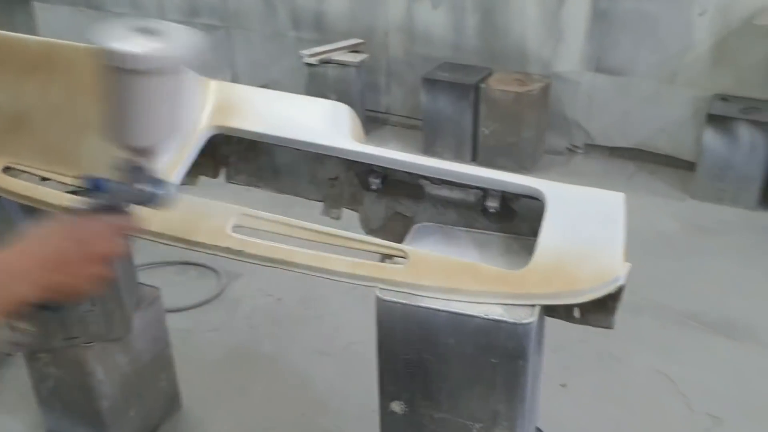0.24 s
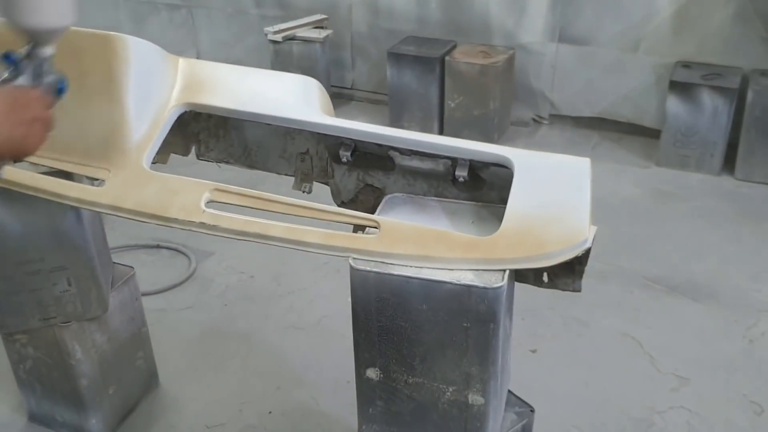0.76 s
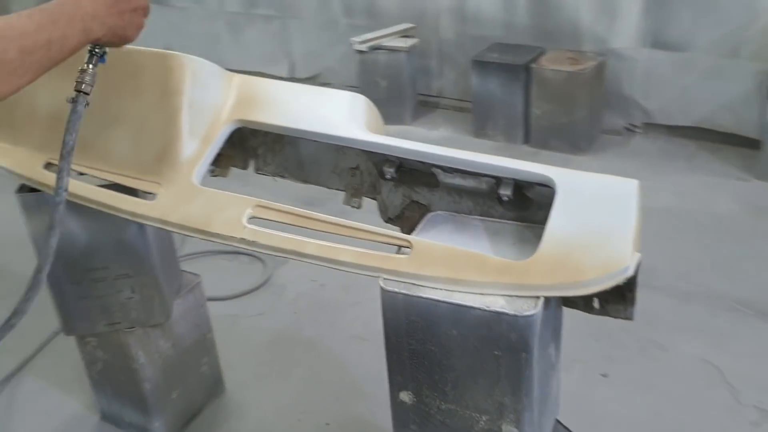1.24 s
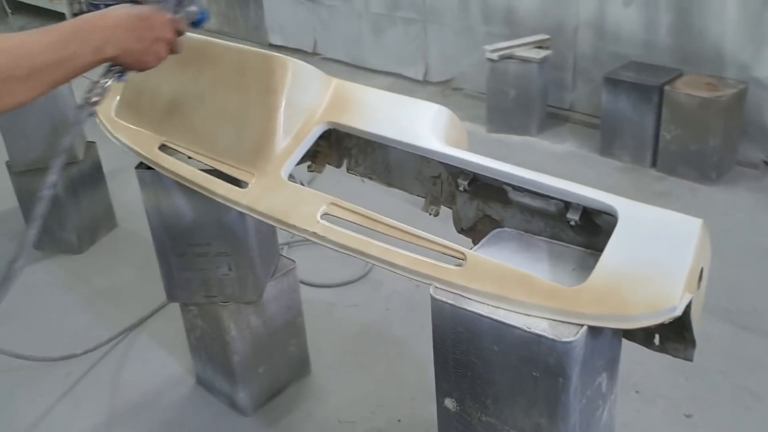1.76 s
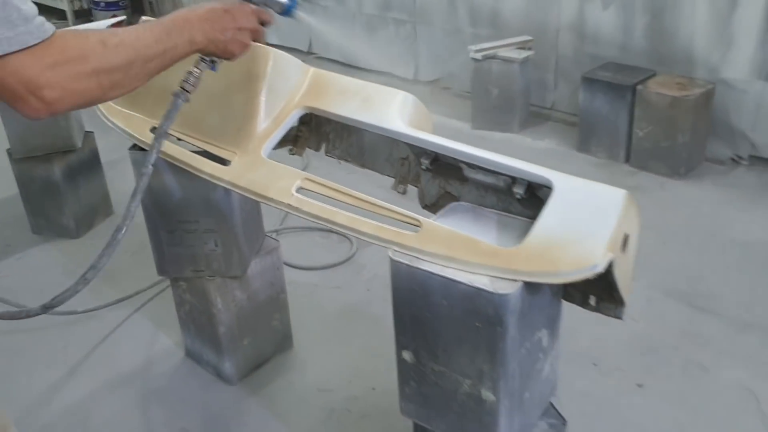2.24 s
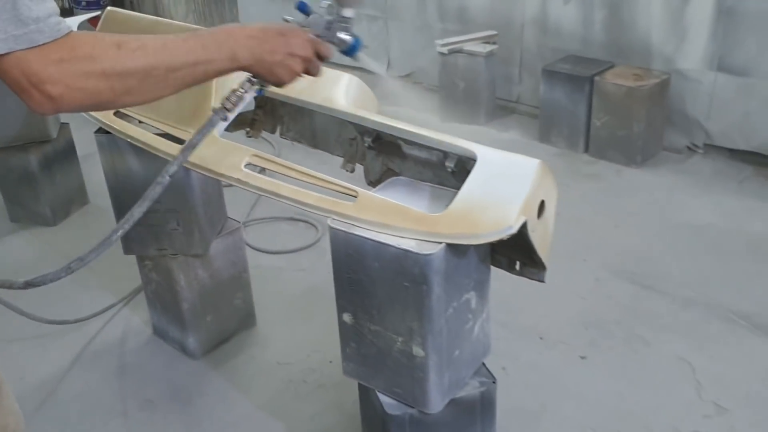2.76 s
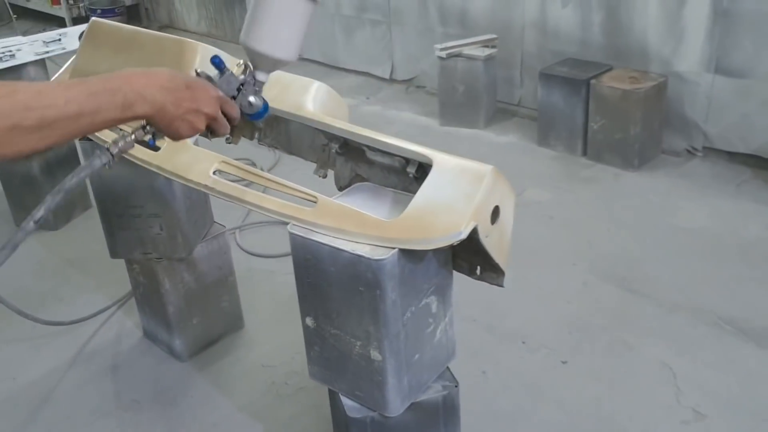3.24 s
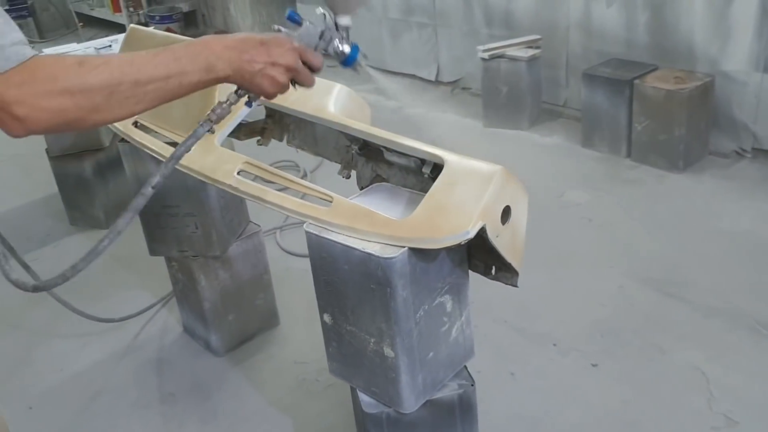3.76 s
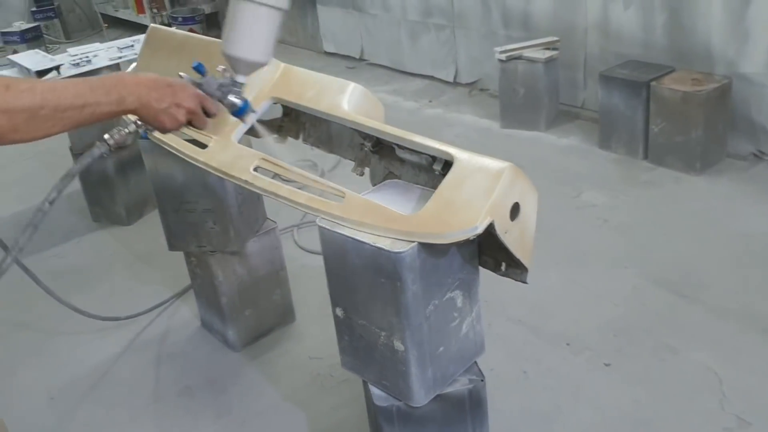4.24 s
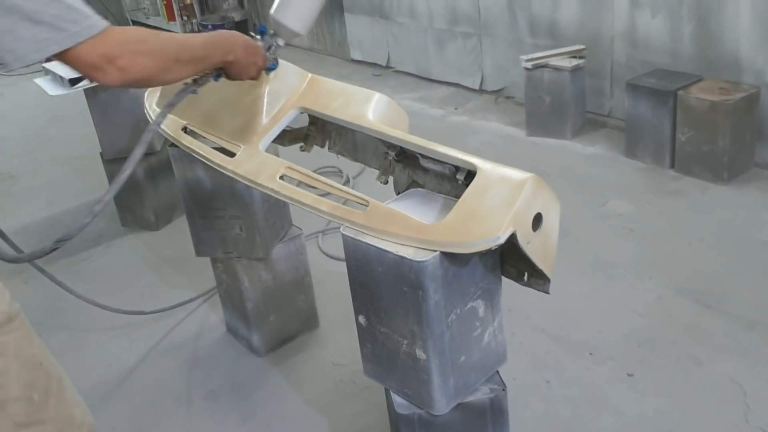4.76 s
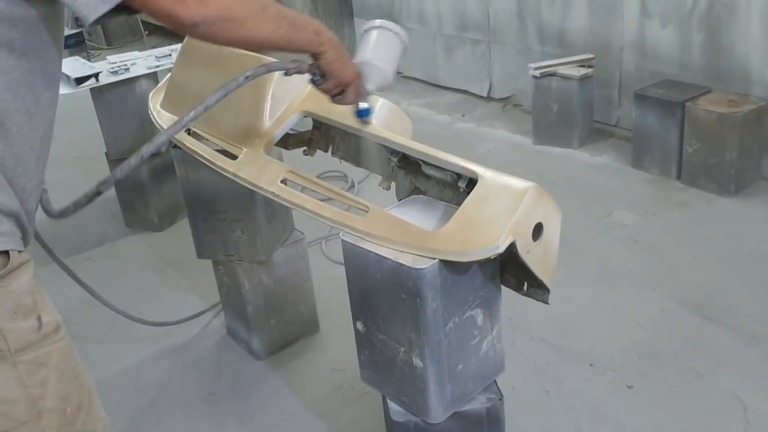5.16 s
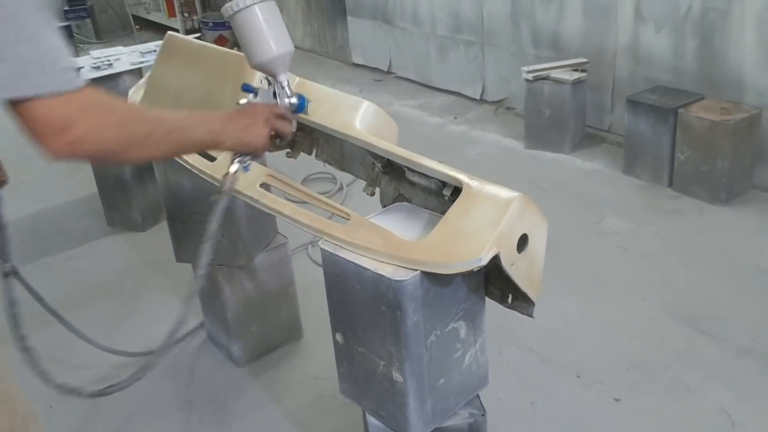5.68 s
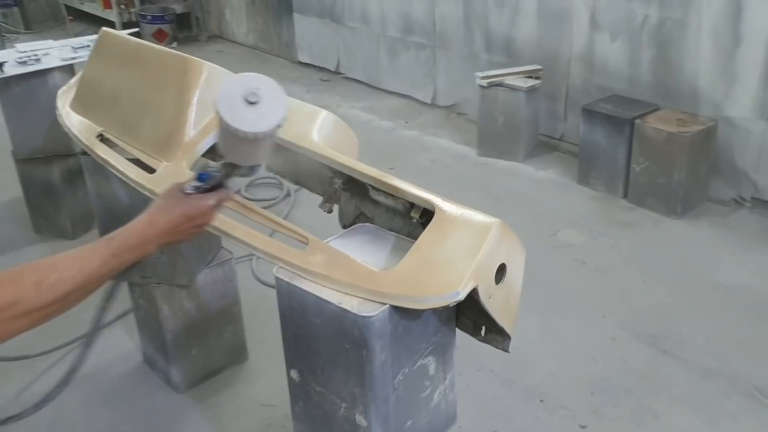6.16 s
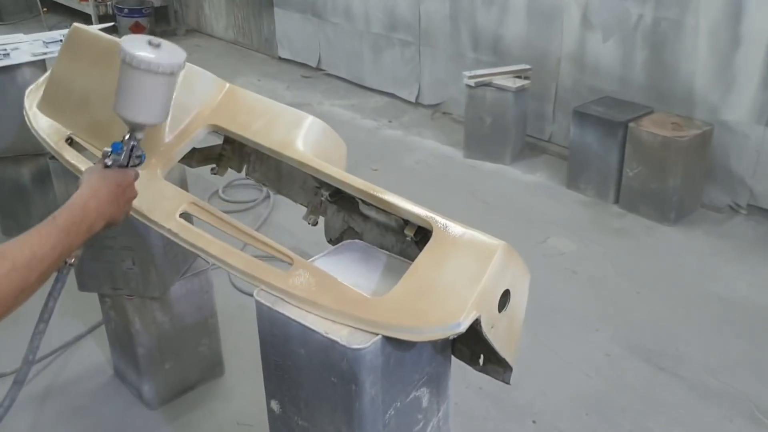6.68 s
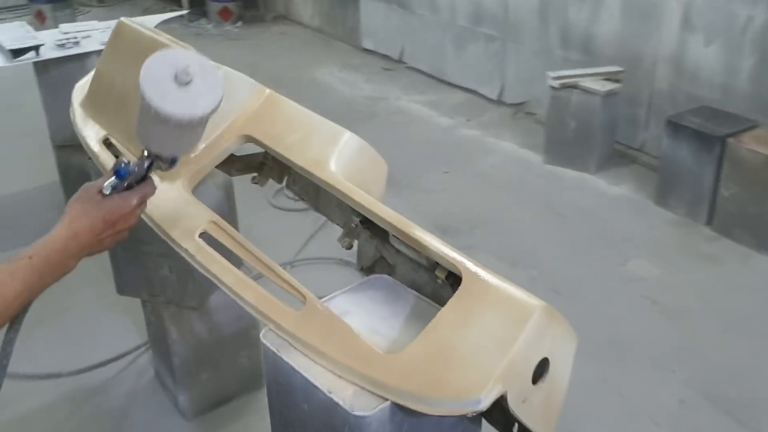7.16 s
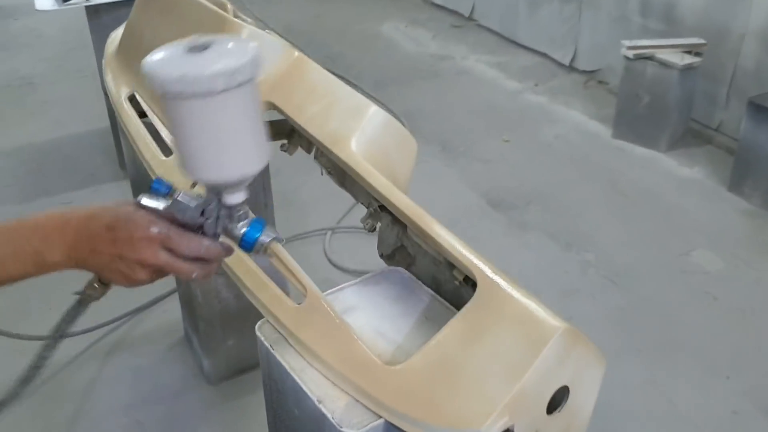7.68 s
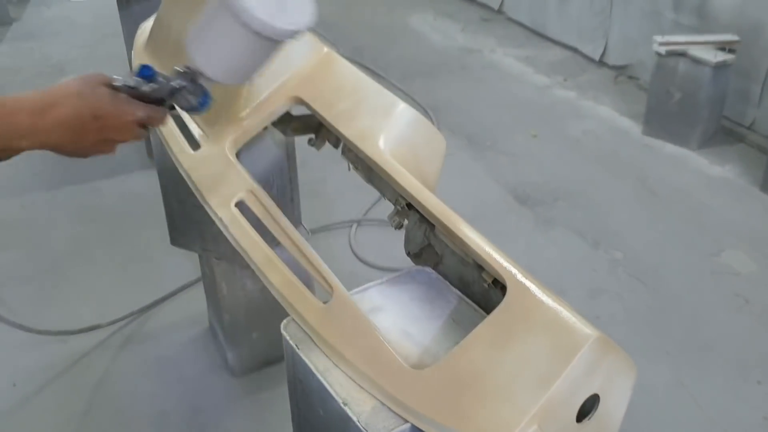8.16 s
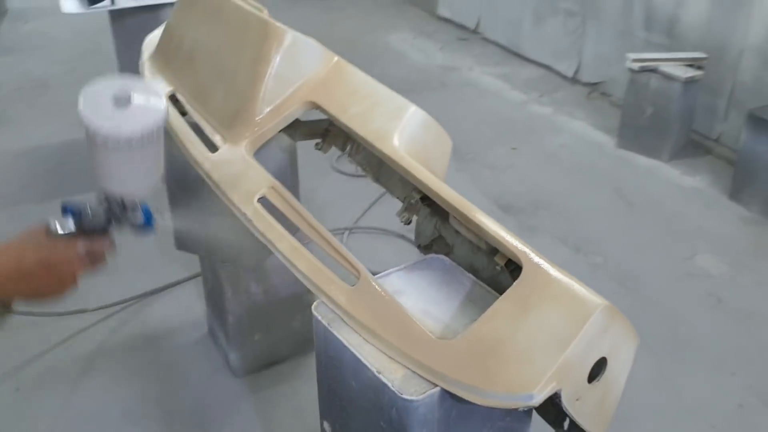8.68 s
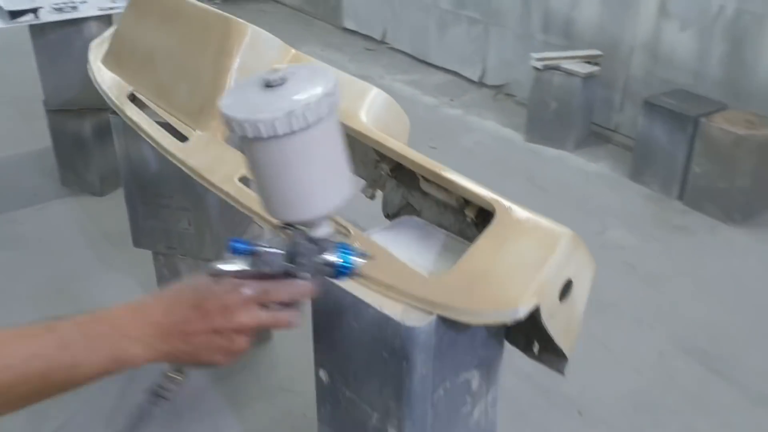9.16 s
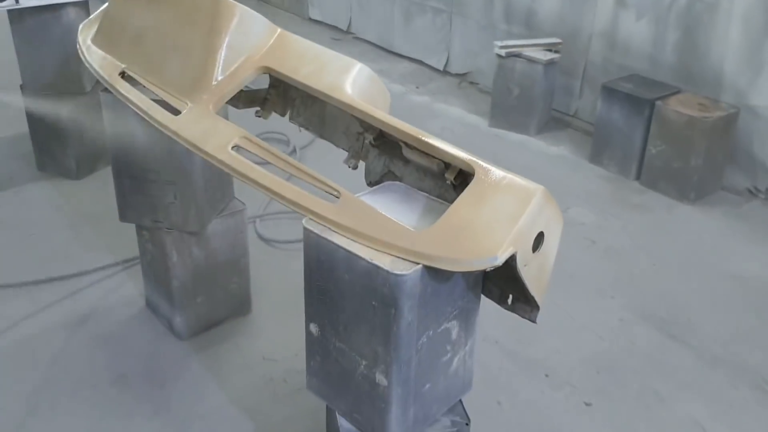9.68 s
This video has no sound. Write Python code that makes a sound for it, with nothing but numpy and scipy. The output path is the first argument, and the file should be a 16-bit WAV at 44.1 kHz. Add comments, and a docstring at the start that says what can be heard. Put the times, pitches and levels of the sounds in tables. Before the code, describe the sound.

A compressed-air spray gun hisses in seventeen short, separate bursts inside a hard-walled booth, over the steady low hum of an extractor fan.

```python
"""Spray gun in a reverberant booth

A compressed-air spray gun paints a panel in short passes inside a hard-walled booth, over an extractor fan.
The two-stage trigger lets out bare air first and last, so each pass starts and ends with a brighter flare;
in between, paint loads the jet and dulls it. Jet and mist are filtered noise, the booth rings by convolution
with decaying noise, and the fan is coloured noise plus throbbing tones.
"""
import sys
import numpy as np
from scipy import signal
from scipy.fft import rfft, irfft
from scipy.io import wavfile
from scipy.ndimage import map_coordinates

SR = 44100
rng = np.random.default_rng(int(sys.argv[2]) if len(sys.argv) > 2 else 0)


def wav_record(signal):
    """Record a signal, one row per channel, as 16-bit PCM in the file named by sys.argv[1]."""
    frames = np.transpose(np.atleast_2d(signal))
    bounded = np.clip(frames, -1, 1)
    # unit amplitude maps onto the largest positive 16-bit level
    quanta = np.round(bounded * 32767).astype(np.int16)
    wavfile.write(sys.argv[1], SR, quanta)


N = 437472
T = np.arange(N) / SR  # time, s
HZ = np.maximum(np.fft.rfftfreq(N, 1 / SR), 1)  # frequency bins, Hz, kept above zero for the logarithm

# Air rushing through the extractor: [f/Hz, relative spectral density/dB]
DUCT_SPECTRUM = [(25, -34), (48, -20), (90, -11.5), (115, -11.5), (140, 3), (185, 3), (250, -6),
                 (370, -8.5), (700, -11.5), (1100, -16), (2400, -19.5), (5500, -28), (8000, -33),
                 (16000, -33.5)]
# Weaker fan tones: [f/Hz, half-width/Hz, relative level/dB]
WEAK_FAN_TONES = [(103.7, 9.6, -4), (208.5, 6.7, -2.5), (244.8, 9.9, -1), (422, 4.1, -5), (528.5, 6, -8)]
# Fan levels, before overall trims, as the listener steps through its standing waves:
# [t/s, blade hum level/dB, overtone level/dB, low drone level/dB, level of rumble and weak tones/dB]
FAN_LEVELS = [(0, -29.5, -45.5, -48, 1.5), (.55, -22, -42, -46.5, 1.5), (.9, -28.5, -44.5, -50, 1.5),
              (1.85, -29, -38.5, -44, 1), (2.9, -31.5, -47.5, -44, 1.1), (3.5, -34.5, -46, -45, 0.3),
              (4.2, -35, -43.5, -45, 0.5), (5.6, -36, -46.5, -42.5, 0.5), (6.5, -37, -49.5, -46, 0.5),
              (7.4, -28, -40.5, -43, 0.8), (7.7, -32.5, -40, -41.5, -1.5), (8.25, -38, -43, -51, -1.5),
              (8.85, -30.5, -48.5, -43, -1.5), (9.8, -32.5, -48, -50, -.5)]
# Likeness of the two sides in the diffuse sound: [f/Hz, correlation/1]
SIDE_LIKENESS = [(60, 0.9), (140, 0.83), (290, 0.86), (640, 0.41), (1300, 0)]
# Booth reverberation time: [f/Hz, t60/s]
REVERB_TIMES = [(500, 0.39), (2500, 0.65), (5500, 0.71), (10000, 0.61), (15000, 0.38)]
# Bare air from the cap: [f/Hz, relative spectral density/dB]
AIR_SPECTRUM = [(1000, -24), (1700, -23.5), (2600, -13), (4000, -6.5), (5600, -1.5), (8000, -8),
                (10000, -2), (12300, 2), (14000, -2), (16000, -8.5)]
# Paint torn into mist: [f/Hz, relative spectral density/dB]
PAINT_SPECTRUM = [(300, -8), (700, -2), (1400, -4.5), (2800, 0.5), (5000, 1), (8000, -6), (16000, -43)]
# Trigger pulls: [air on t/s, air off t/s, relative level/dB, opening flare/dB, closing flare/dB]
TRIGGER_PULLS = [(0.0, 0.542, -26.5, 4.5, 7.5), (0.62, 0.883, -27.5, 5.5, 7.5),
                 (0.951, 1.24, -27.2, 6.5, 9), (1.293, 1.552, -27, 6, 10.5), (1.817, 2.159, -26, 6, 8.5),
                 (2.217, 2.463, -27.3, 7.5, 5), (2.496, 3.253, -26.5, 2, 8), (3.359, 3.66, -26, 8, 5),
                 (3.752, 4.002, -25, 5.5, 4), (4.158, 4.528, -26.5, 8.5, 6), (4.846, 5.574, -26.5, 6, 6),
                 (6.007, 6.565, -27, 8.5, 6), (6.834, 7.094, -27.2, 6.5, 6.5),
                 (7.289, 7.715, -25.5, 3, 3.5), (7.935, 8.238, -27, 10.5, 7), (8.512, 9.118, -27, 4.2, 4.5),
                 (9.276, 9.897, -28, 8, 11)]
# The nozzle swings toward and away from the listener: [t/s, direct sound level/dB]
NOZZLE_SWING = [(0, -3), (.4, -10.5), (1.5, -12.5), (2.1, -8.5), (3.3, -10), (4.6, -18.5), (5.45, -4.5),
                (6.05, -3.5), (6.6, -14), (7.48, -11), (7.63, -1), (7.665, 3.5), (7.72, 4), (7.98, -4.5),
                (8.45, -22.5), (9.05, -4), (9.4, -5.5), (9.8, -13)]
# Right side relative to left: [f/Hz, level difference/dB]
RIGHT_OVER_LEFT = [(60, -0.5), (180, -2.5), (400, -1), (1200, -1), (2300, 2), (3500, 2), (4800, 5.5),
                   (6200, 12), (7300, 3.5), (8800, -3.5), (10500, -3), (13000, .3), (16000, -2)]

HUM_HZ, OVERTONE_HZ, DRONE_HZ = 159.2, 312.5, 70.7
WEAK_TONES_DB = -41.5
VALVE_S = 0.022  # the air valve opens or shuts
LEAD_S, TRAIL_S = 0.081, 0.039  # bare air before and after the paint
NEEDLE_OPEN_S, NEEDLE_SHUT_S = 0.036, 0.019  # the paint needle slides back, and springs shut
# Facing the listener, the jet reaches both sides at once; turned away, it is fainter and the left side lags
FACING_DB, LAG_MS_PER_DB = 2.5, 0.1
END_S, TOP_HZ = 9.805, 15850  # the sound ends; the treble is cut


def amp(db):
    """Level definition: decibels to amplitude gain."""
    return 10 ** (np.asarray(db) / 20)


def along(points, hz=HZ):
    """Spectral interpolation: values read off a logarithmic frequency axis."""
    f, value = np.transpose(points)
    return np.interp(np.log(hz), np.log(f), value)


def curves(rows):
    """Linear interpolation: every column of a timed table, sample by sample."""
    s, *columns = np.transpose(rows)
    return [np.interp(T, s, column) for column in columns]


def noise(gain):
    """Spectral shaping: white noise weighted at each frequency, scaled to rms 1."""
    x = irfft(rfft(rng.standard_normal(N)) * gain, N)
    return x / x.std()


def walk(rate_hz):
    """Band-limited chance: random levels, 2 * rate_hz a second, joined by straight lines; spread 1."""
    knots = np.random.default_rng(rng.integers(2 ** 31)).standard_normal(N // 10)
    x = np.interp(T * 2 * rate_hz, np.arange(len(knots)), knots)
    return x / x.std()


def diffuse(gain):
    """Diffuse-field coherence: noise alike on both sides in the bass, unrelated in the treble."""
    alike = np.clip(along(SIDE_LIKENESS), -1, 1)
    mid_side_gain = np.sqrt([1 + alike, 1 - alike])
    mid, side = rfft(rng.standard_normal((2, N))) * gain * mid_side_gain
    x = irfft(np.array([mid + side, mid - side]), N)
    return x / x.std()


def fan_tone(hz, db, throb, throb_hz, wander_hz):
    """Turbulent modulation: a fan line drifts a little and throbs at random in the turbulent intake."""
    phase = 2 * np.pi * np.cumsum(hz + wander_hz * walk(2)) / SR
    # the complex factor shifts both amplitude and phase
    turbulence = 1 + throb * (walk(throb_hz) + 1j * walk(throb_hz))
    tone = np.imag(turbulence * np.exp(1j * phase))
    return tone / tone.std() * amp(db)


def weak_fan_tones():
    """Resonance line shape: diffuse noise narrowed to a sum of bell-shaped spectral lines."""
    lines = 0
    for hz, width_hz, db in WEAK_FAN_TONES:
        # dividing by the root of the width keeps a line's power independent of its width
        lines = lines + amp(db) / np.sqrt(width_hz) / (1 + ((HZ - hz) / width_hz) ** 2)
    return diffuse(lines) * amp(WEAK_TONES_DB)


def extractor(rumble_db, hum_db, drone_db):
    """Fan noise: broadband duct rumble and weak tones, plus blade hum, its overtone and a low drone."""
    hum_level, overtone_level, drone_level, rumble_level = curves(FAN_LEVELS)
    rumble = diffuse(amp(along(DUCT_SPECTRUM))) * amp(rumble_db + 0.69 * walk(4.4))
    tones = weak_fan_tones()
    hum = fan_tone(HUM_HZ, hum_level + hum_db, throb=0.61, throb_hz=11, wander_hz=0.718)
    overtone = fan_tone(OVERTONE_HZ, overtone_level + hum_db, throb=0.82, throb_hz=11, wander_hz=1.413)
    drone = fan_tone(DRONE_HZ, drone_level + drone_db, throb=0.97, throb_hz=6, wander_hz=1.36)
    return (rumble + tones) * amp(rumble_level) + hum + overtone + drone


def echoes(build_s):
    """Exponential decay: one second of dense echoes, unrelated on the two sides, dying at a t60 set by f."""
    hz, s, bins = signal.stft(rng.standard_normal((2, SR)), SR, nperseg=256)
    t60 = along(REVERB_TIMES, hz + 1)[:, None]
    decay = np.exp(-np.log(1000) * s / t60)
    # the root of t60 evens out the energy of long and short decays
    tail = signal.istft(bins * decay / np.sqrt(t60), SR)[1][:, :SR]
    tail = tail * (1 - np.exp(-T[:SR] / build_s))
    return tail / np.sqrt(np.sum(tail ** 2, axis=1, keepdims=True))


def booth(x, build_s, swirl_hz, count=8):
    """Time-varying reverberation: the swirling jet keeps finding new echo paths, so no resonance stands still."""
    shares = np.array([walk(swirl_hz) for _ in range(count)])
    shares = shares / np.sqrt(np.sum(shares ** 2, axis=0))  # the squared shares sum to 1
    walls = np.zeros((2, N))
    for share in shares:
        walls += signal.fftconvolve((x * share)[None], echoes(build_s), axes=1)[:, :N]
    return walls


def trigger():
    """Two-stage valve: air flow gain, and the flare in dB of the jet while the paint needle is shut."""
    flow, flare_db = np.zeros(N), np.zeros(N)
    for on, off, db, first_db, last_db in TRIGGER_PULLS:
        held = (T > on) & (T < off)
        since, until = T[held] - on, off - T[held]
        opening = np.minimum(np.minimum(since, until) / VALVE_S, 1)
        flow[held] = amp(db) * opening
        bare_first = (1 + np.tanh((LEAD_S - since) / NEEDLE_OPEN_S)) / 2
        bare_last = (1 + np.tanh((TRAIL_S - until) / NEEDLE_SHUT_S)) / 2
        flare_db[held] = first_db * bare_first + last_db * bare_last
    return flow, flare_db


def spray(air_db, paint_db, paint_loss, flutter_db, spatter_db):
    """Jet noise: the air cap hisses; paint torn into mist adds a lower, uneven rush that fades in the flares."""
    flow, flare_db = trigger()
    air_level = air_db + flare_db + flutter_db * walk(40)
    air = noise(amp(along(AIR_SPECTRUM))) * amp(air_level)
    paint_level = paint_db - paint_loss * flare_db + spatter_db * walk(120)
    paint = noise(amp(along(PAINT_SPECTRUM))) * amp(paint_level)
    return flow * (air + paint)


def delayed(x, ms):
    """Propagation delay: the signal read a varying number of milliseconds earlier."""
    return map_coordinates(x, [(T - ms / 1000) * SR], order=3)


def direct(x, beam_hz, panel_ms, panel_db):
    """Directivity and comb filtering: beamed treble plus its panel bounce, whose path shifts with the hand."""
    near_db, = curves(NOZZLE_SWING)
    lag_ms = LAG_MS_PER_DB * np.maximum(FACING_DB - near_db, 0)
    beam = signal.sosfilt(signal.butter(2, beam_hz, "high", fs=SR, output="sos"), x)
    bounce = amp(panel_db) * delayed(beam, panel_ms * (1 + 0.15 * walk(1.7)))
    near = (beam + bounce) * amp(near_db)
    return np.array([delayed(near, lag_ms), near])  # left, right


def scene():
    """Superposition: the gun, heard mostly by way of the walls, over the fan."""
    fan = extractor(rumble_db=-32.5, hum_db=-1.0, drone_db=-1)
    gun = spray(air_db=1.4, paint_db=-5.5, paint_loss=0.31, flutter_db=1.2, spatter_db=1.24)
    walls = booth(gun, build_s=0.0029, swirl_hz=90.07)
    near = direct(gun, beam_hz=3500, panel_ms=0.911, panel_db=-4.5)
    return fan + walls + near


def record(dry):
    """Receiver response: two microphone ports colour the hiss differently; treble is cut and sound stops short."""
    tilt_db = along(RIGHT_OVER_LEFT) / 2  # half the difference to each side
    ports = irfft(rfft(dry) * amp([-tilt_db, tilt_db]), N)
    stop = np.clip((END_S - T) / .01, 0, 1)  # 10 ms fade
    top_cut = signal.ellip(12, .1, 80, TOP_HZ, fs=SR, output="sos")
    return signal.sosfilt(top_cut, ports * stop)


dry = scene()
out = record(dry)
wav_record(out)
```